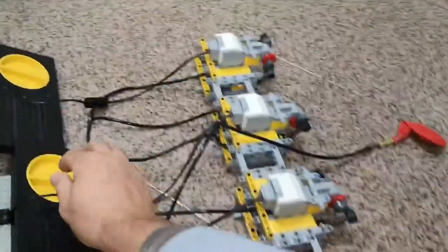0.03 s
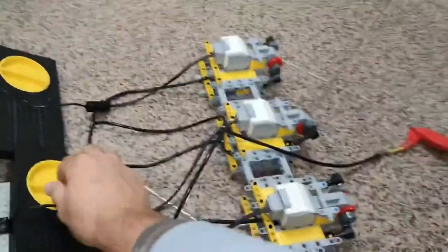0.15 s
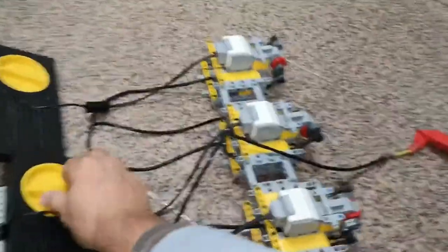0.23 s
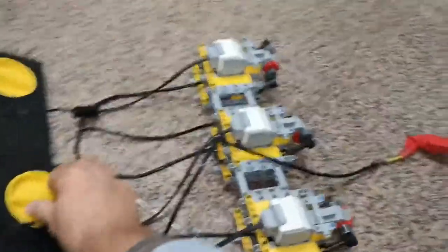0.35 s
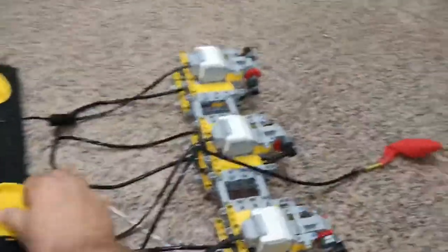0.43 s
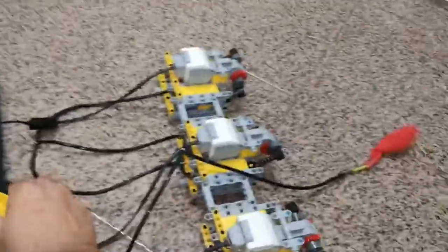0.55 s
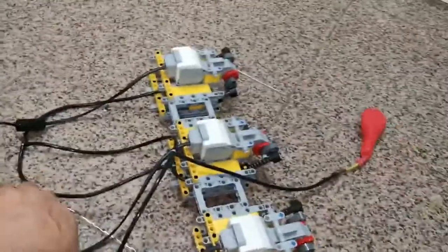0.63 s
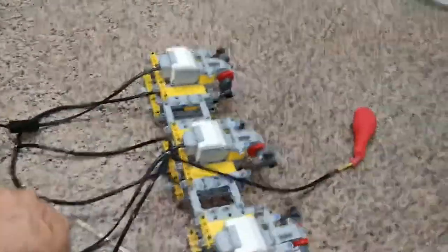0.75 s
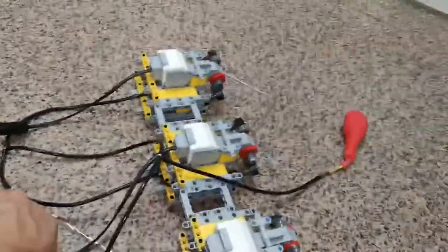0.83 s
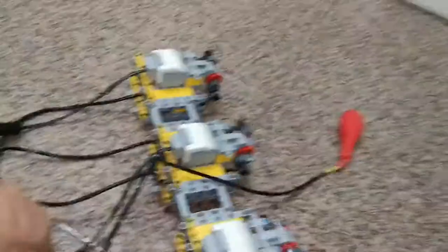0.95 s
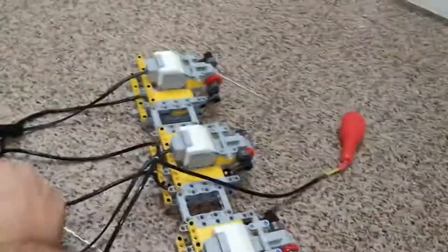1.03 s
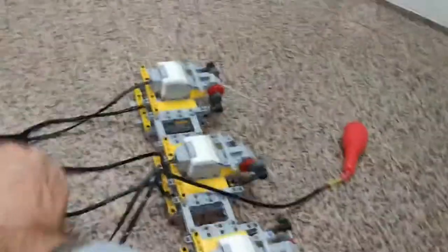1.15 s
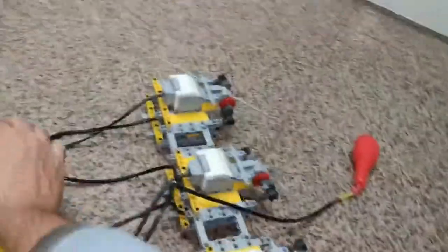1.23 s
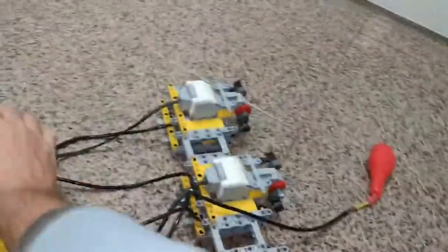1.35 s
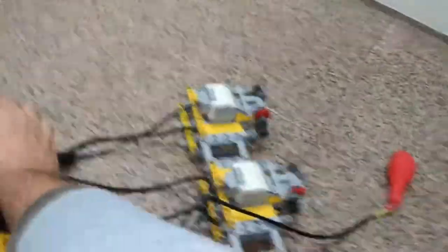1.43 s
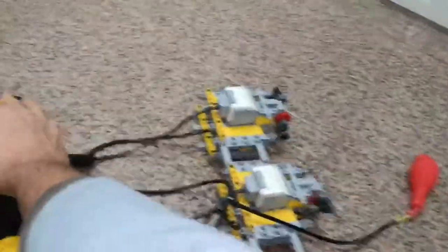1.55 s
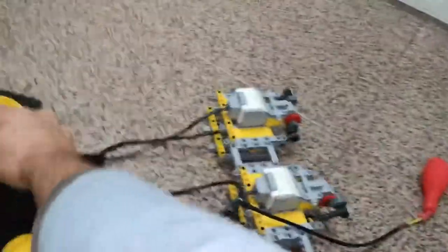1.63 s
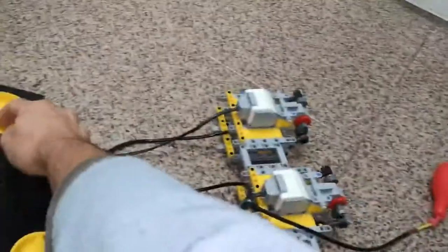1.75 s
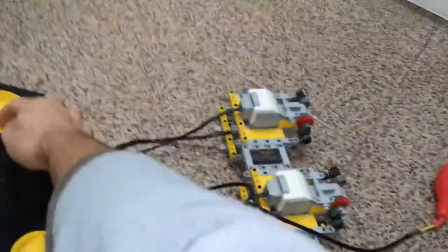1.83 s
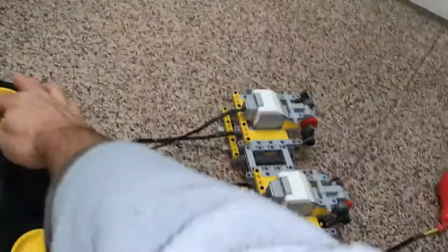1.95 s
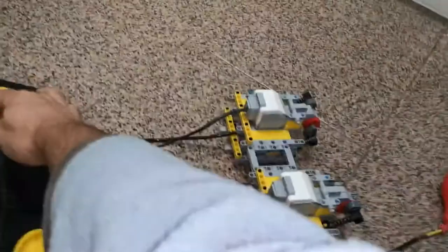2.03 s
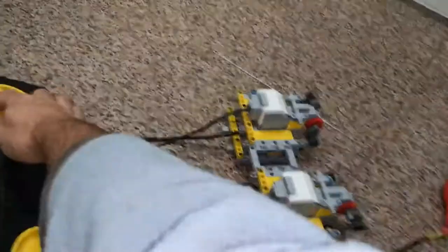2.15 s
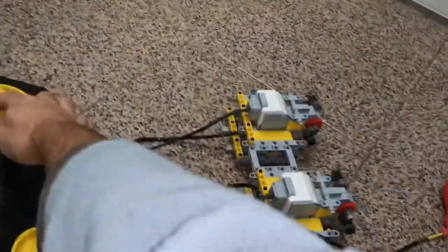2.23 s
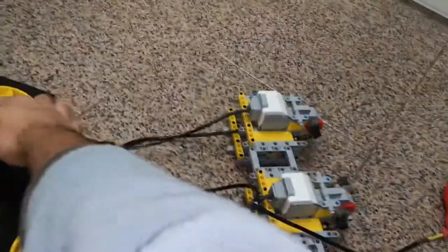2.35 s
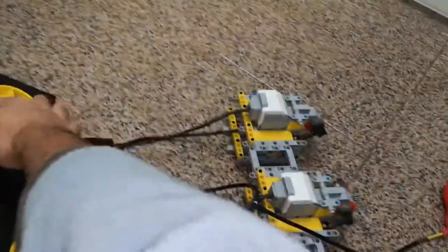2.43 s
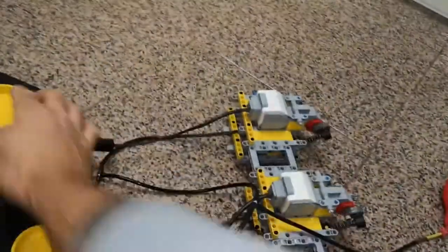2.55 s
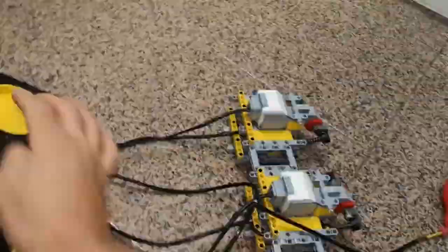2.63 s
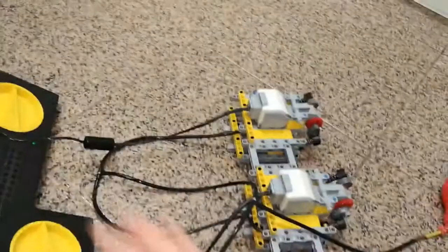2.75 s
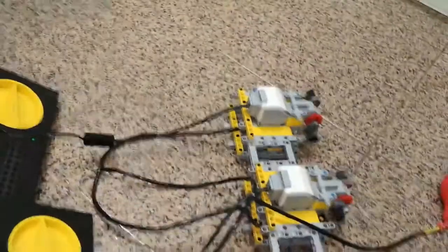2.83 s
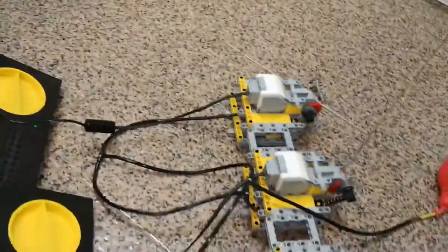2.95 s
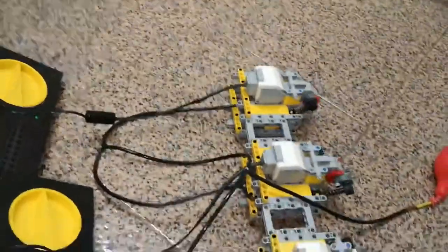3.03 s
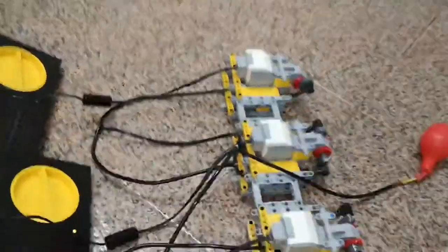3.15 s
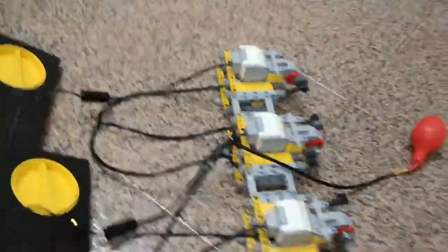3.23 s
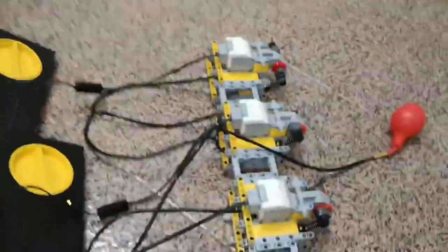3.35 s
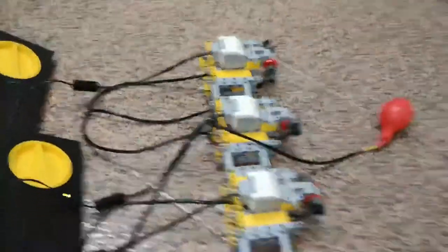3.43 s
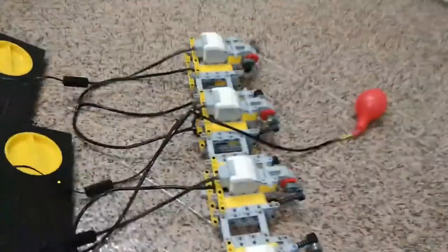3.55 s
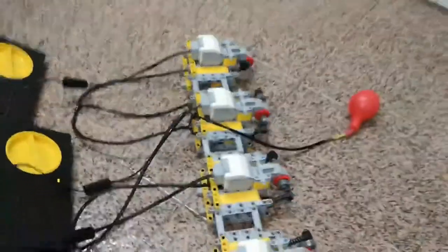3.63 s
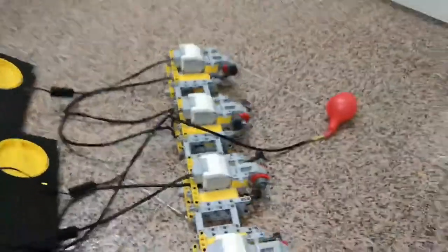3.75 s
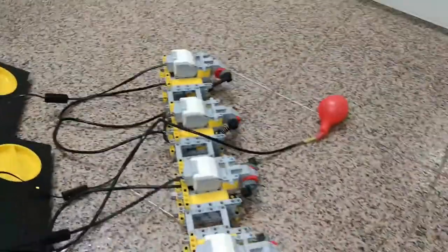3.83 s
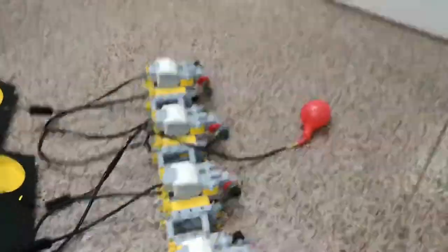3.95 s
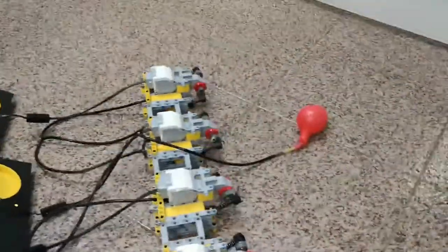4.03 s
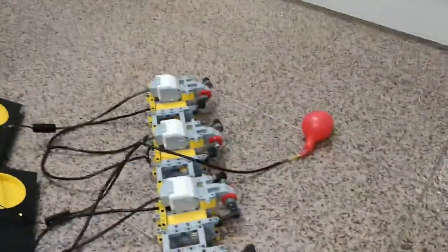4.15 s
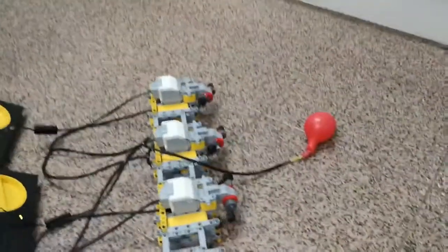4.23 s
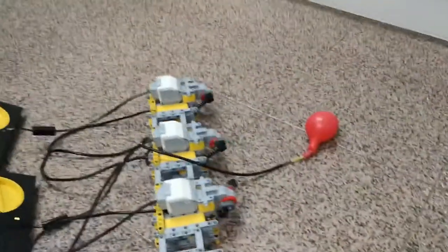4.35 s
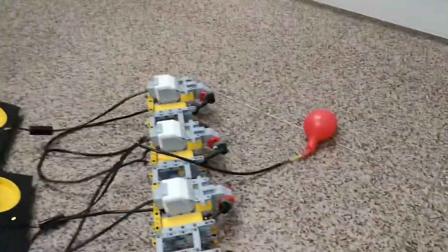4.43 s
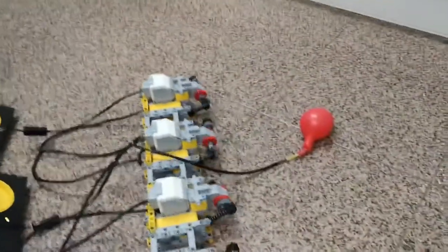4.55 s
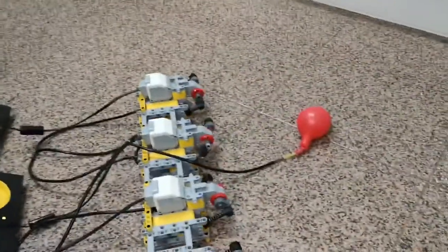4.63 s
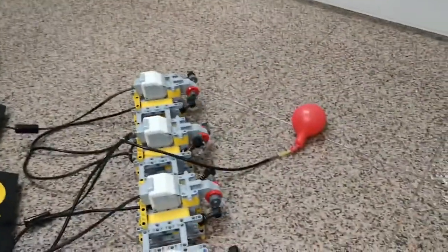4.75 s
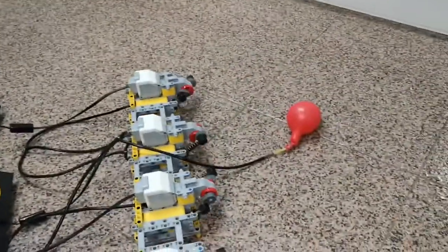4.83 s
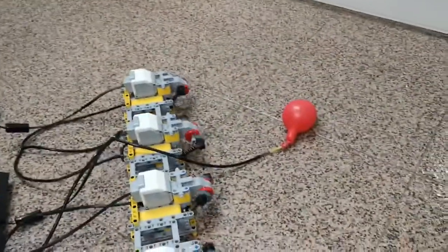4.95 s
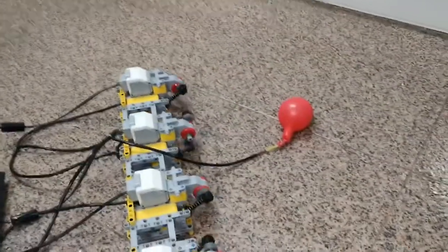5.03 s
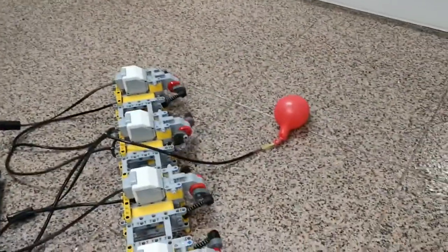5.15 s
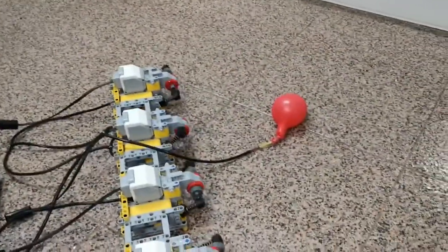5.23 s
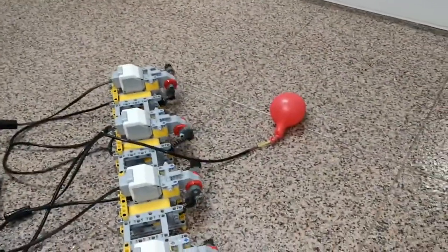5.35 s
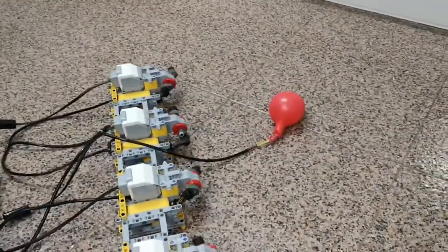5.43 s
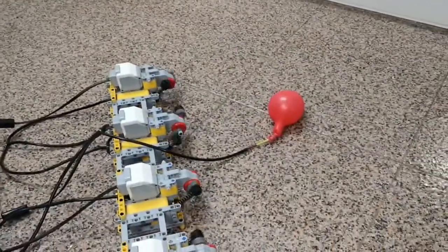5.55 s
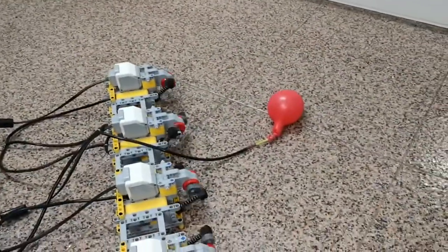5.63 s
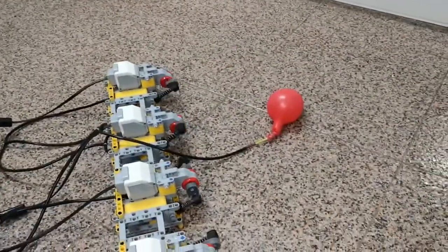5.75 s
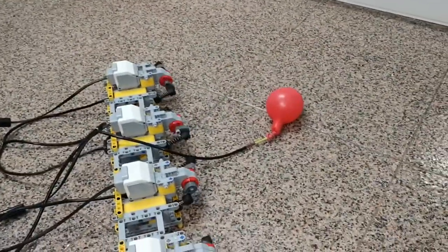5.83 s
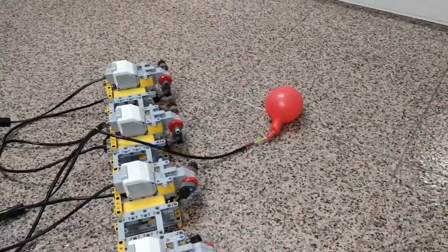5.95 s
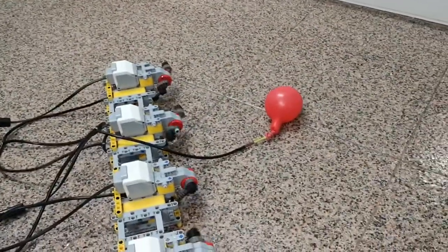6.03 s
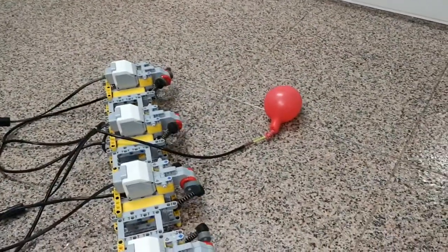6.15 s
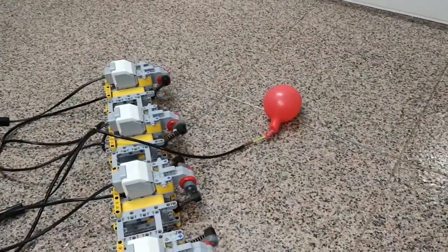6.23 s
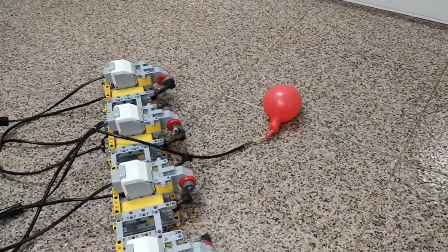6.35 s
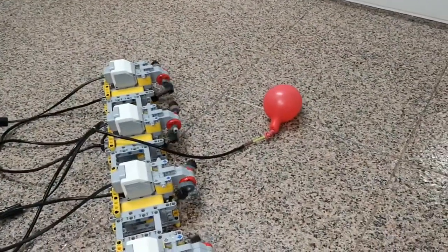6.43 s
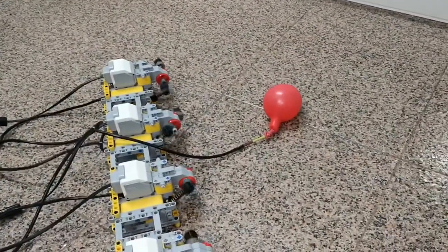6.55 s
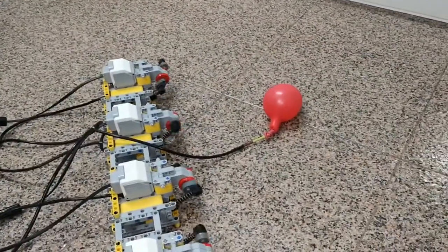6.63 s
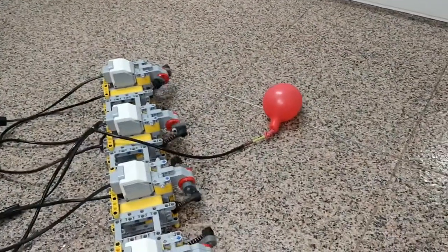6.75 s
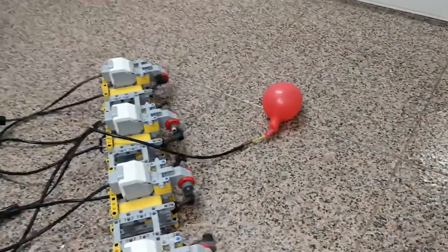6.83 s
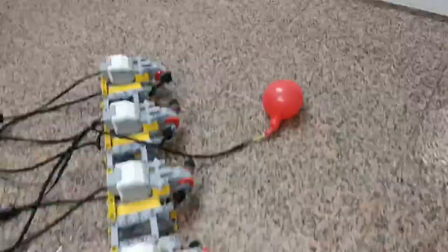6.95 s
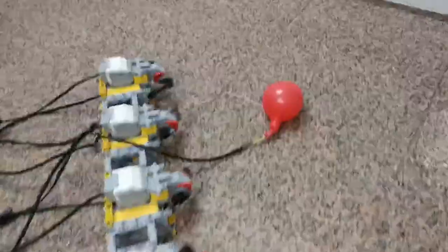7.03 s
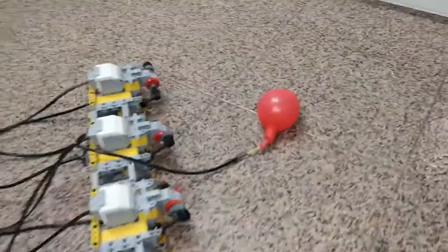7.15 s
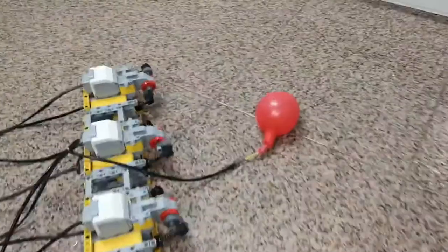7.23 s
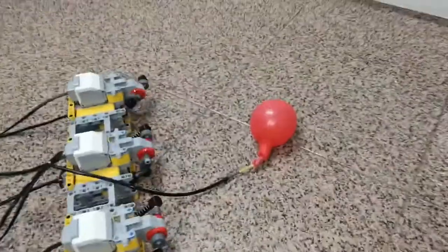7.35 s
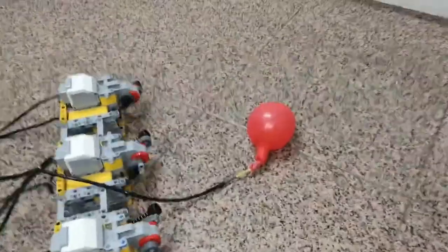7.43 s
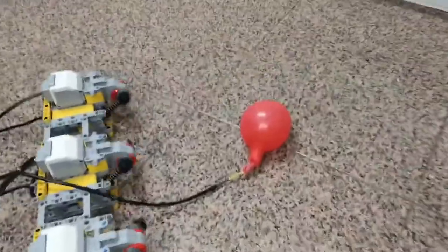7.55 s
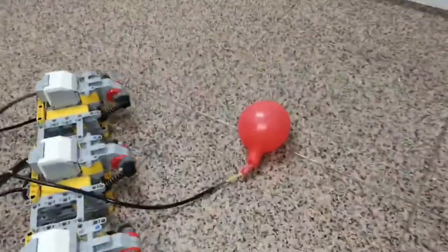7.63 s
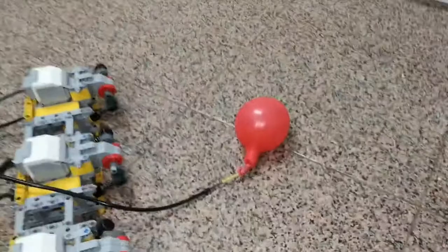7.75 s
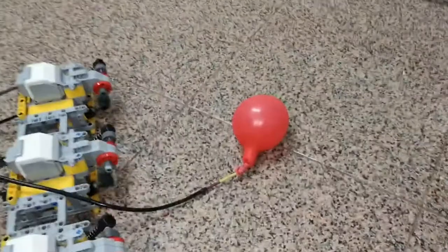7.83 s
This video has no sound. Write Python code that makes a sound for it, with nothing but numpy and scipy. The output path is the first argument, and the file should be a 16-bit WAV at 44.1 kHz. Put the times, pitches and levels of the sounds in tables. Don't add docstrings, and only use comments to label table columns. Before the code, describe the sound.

From the start to about 8 seconds, four small geared motors run without pause, driving toy air pumps on a hard floor. Each gives a thin, nasal whine around two kilohertz that dips and recovers roughly four times a second; the unsynchronized strokes overlap into a fluttering whirr, covered by bright, gritty plastic gear rattle. Sharp clacks fall near 0.5 and 0.9 s, then a firm hollow knock at 1.7 and a cluster of box taps with loose buzz from 2.1 to 2.6, mostly at left. Around 3.6 s the handheld microphone thumps and creaks; small dull bumps and faint rubs return near 5.3 to 5.9 and 7.3 to 7.8. The rattle changes in brightness and shifts from left toward right after about 4 s, swelling closer near 7.3. Short bare-room echo and faint low rumble lie beneath.

```python
import sys
import numpy as np
from scipy import signal
from scipy.fft import rfft, irfft
from scipy.io import wavfile

SR = 44100
rng = np.random.default_rng(int(sys.argv[2]) if len(sys.argv) > 2 else 0)


def digitize_waveform(pressure):
    field = np.atleast_2d(pressure).T
    bounded = np.clip(field, -1, 1)
    quanta = np.round(bounded * 32767).astype(np.int16)
    wavfile.write(sys.argv[1], SR, quanta)


def boost_factor(decibels):
    exponent = np.asarray(decibels, float) / 20
    return 10 ** exponent


N = 348390

# lowest_speed_s, lowest_whine_hz, free_whine_hz, whine_db
STROKES_A = [(0.072, 1762, 2208, -47), (0.319, 1614, 2264, -40), (0.571, 1772, 2314, -47.5),
             (0.813, 1613, 2223, -41), (1.068, 1597, 2243, -43), (1.317, 1562, 2239, -44),
             (1.574, 1626, 2281, -48), (1.826, 1562, 2216, -46), (2.083, 1650, 2230, -49),
             (2.337, 1456, 2260, -39.5), (2.597, 1556, 2232, -44), (2.861, 1408, 2204, -39.5),
             (3.118, 1609, 2241, -37.5), (3.38, 1416, 2196, -40), (3.639, 1575, 2240, -39),
             (3.906, 1411, 2203, -40.5), (4.173, 1565, 2207, -40), (4.435, 1577, 2200, -42),
             (4.682, 1573, 2261, -39), (4.946, 1456, 2191, -45), (5.221, 1517, 2183, -41.5),
             (5.475, 1475, 2184, -44.5), (5.739, 1527, 2200, -43.5), (5.996, 1543, 2186, -39),
             (6.253, 1602, 2218, -46.5), (6.518, 1593, 2210, -39), (6.775, 1544, 2204, -44.6),
             (7.037, 1486, 2202, -39), (7.286, 1577, 2232, -42), (7.543, 1469, 2198, -40),
             (7.802, 1640, 2244, -42)]
STROKES_B = [(0.0, 1920, 2020, -71), (0.239, 1810, 2235, -41.5), (0.499, 1923, 2163, -41),
             (0.733, 1746, 2247, -46.5), (0.987, 1841, 2173, -36), (1.237, 1690, 1995, -48),
             (1.486, 1743, 2134, -35.5), (1.736, 1691, 1992, -47), (1.983, 1740, 2177, -45.5),
             (2.235, 2120, 2205, -49), (2.489, 1736, 2165, -45), (2.739, 1569, 2166, -49),
             (3.011, 1652, 2117, -38.5), (3.285, 1486, 2320, -40.5), (3.544, 1648, 2124, -41.5),
             (3.795, 1500, 2160, -42), (4.049, 1773, 2334, -39.5), (4.31, 1572, 2171, -44.5),
             (4.578, 1780, 2224, -43.0), (4.839, 1482, 2118, -53), (5.098, 1819, 2190, -39),
             (5.348, 1647, 2192, -52), (5.605, 1609, 2110, -37.5), (5.882, 1559, 2152, -46.5),
             (6.146, 1660, 2166, -39.5), (6.41, 1607, 2114, -48), (6.68, 1687, 2116, -41.5),
             (6.934, 1408, 2098, -55), (7.194, 1765, 2137, -39.5), (7.446, 1573, 2111, -48),
             (7.705, 1788, 2130, -40.5)]
STROKES_C = [(0.072, 1940, 2054, -64), (0.335, 1642, 2260, -50), (0.605, 1798, 2090, -32.5),
             (0.863, 1666, 2020, -56), (1.126, 1750, 2140, -56), (1.392, 1777, 2265, -44),
             (1.644, 2122, 2237, -36.5), (1.903, 1698, 2326, -35.5), (2.163, 2124, 2344, -38),
             (2.409, 1702, 2117, -39), (2.656, 2132, 2253, -34.5), (2.902, 1616, 2011, -53),
             (3.158, 2135, 2232, -33.5), (3.425, 2097, 2168, -49), (3.684, 1602, 2130, -50),
             (3.949, 1804, 2023, -41), (4.213, 1492, 2208, -37), (4.465, 1659, 2025, -44),
             (4.707, 1528, 2247, -38), (4.949, 1508, 2199, -37), (5.201, 1669, 2288, -39),
             (5.475, 1530, 2210, -35), (5.733, 1623, 2229, -40), (5.994, 1607, 2208, -41),
             (6.263, 1624, 2264, -52), (6.53, 2076, 2243, -45), (6.795, 2110, 2333, -41),
             (7.041, 1407, 2223, -38), (7.301, 1582, 2288, -39), (7.57, 2105, 2231, -54),
             (7.835, 1665, 2058, -57)]
STROKES_D = [(0.177, 1783, 1984, -34), (0.452, 1720, 2082, -54), (0.719, 1892, 2173, -34),
             (0.98, 1638, 2060, -47), (1.229, 2107, 2232, -39), (1.489, 1820, 2174, -39),
             (1.744, 2072, 2270, -42), (2.011, 1770, 1992, -39), (2.252, 1675, 2004, -41),
             (2.515, 1754, 2165, -42), (2.776, 2078, 2200, -58), (3.032, 1725, 2124, -48),
             (3.293, 1562, 2320, -51), (3.554, 2120, 2347, -34), (3.811, 1704, 2240, -49),
             (4.083, 1785, 2042, -34), (4.35, 1413, 2085, -54), (4.607, 1793, 2115, -36),
             (4.866, 1474, 2000, -54), (5.141, 1585, 2045, -32), (5.389, 1512, 2012, -49),
             (5.643, 1680, 2120, -33), (5.894, 1523, 2154, -59), (6.154, 1786, 2200, -49),
             (6.403, 2128, 2233, -51), (6.647, 1740, 2282, -54), (6.894, 1779, 2300, -34.5),
             (7.141, 2124, 2214, -50), (7.393, 1675, 2160, -52), (7.643, 2167, 2230, -42),
             (7.897, 1883, 1994, -56)]
# distance_db, upper_orders_db
MOTOR_LEVELS = [(-2.5, 1.5), (-3.5, -1), (-9, -2), (-9.5, -5)]
# whine_multiple, level_db
MESH_ORDERS = [(0.5, 2), (1, 4), (1.5, 0), (2, -8), (2.5, -7), (3, -7), (4, -10)]
# frequency_hz, level_db
HOUSING_RESPONSE = [(700, -36), (950, -37.5), (1100, -10), (1400, -13), (1750, 0), (2200, -1), (2750, -9.5),
                    (3050, 2.5), (3500, 2.5), (4000, -2.5), (5200, 1), (7000, -6), (10500, -20)]
RATTLE_CENTRES = [1900, 3389, 5582, 10000]
# frequency_hz, density_db_per_hz
RATTLE_SPECTRUM = [(470, -62), (800, -28), (998, -28), (1090, -11), (1290, -13.5), (1800, -2.5), (2500, -1),
                   (3120, 0), (4300, -2), (5220, 5), (6200, -3.5), (7100, 2.5), (8200, -7.5), (9800, -2),
                   (11300, -7), (15000, -19.5)]
# frequency_hz, likeness_ratio
LIKENESS = [(900, 1), (2000, 0.4), (4000, 0.04), (6000, 0.62), (8500, 1), (13000, 0.52)]
# level_db, nearness_db_per_db, bearing_db_per_db, tilt_db_per_db,
# near_stall_ratio, far_stall_ratio
RATTLE_GROUPS = [(-40, 1, 0.42, -0.45, 1.1, 0.18), (-34.5, 0.93, 0.65, -0.36, 1.8, 0.092),
                 (-34, 0.05, -0.34, 0.16, 0.59, 0.28), (-38, 0.49, -0.23, -0.28, 0.11, 0.86)]
# time_s, depth_db
NEAR_STALLS = [(0.092, -1.5), (0.351, -4.5), (0.572, -4), (0.83, -4), (1.067, -3), (1.317, -2),
               (1.569, -2.5), (1.778, 0), (2.186, 0), (2.364, -4.1), (2.678, -1), (2.882, -2.5),
               (3.114, -3.9), (3.378, -1), (3.603, -4.3), (3.914, -1.5), (4.157, -1.4), (4.424, -1.5),
               (4.689, -2.7), (5.206, -2), (5.458, -3.5), (5.725, -1), (6.005, 0), (6.38, -1), (6.616, -2),
               (6.768, -0.5), (7.044, -4), (7.278, -2), (7.526, -4), (7.799, 0)]
# time_s, depth_db
FAR_STALLS = [(0.292, -6.5), (0.788, -3.6), (1.016, -2.5), (1.483, -5.5), (1.748, -2.5), (2.332, -3.5),
              (2.827, -5), (3.271, -5), (3.797, -4), (4.23, -3), (4.761, -3.5), (5.147, -4), (5.434, -1.8),
              (5.712, -2.5), (6.111, -1.7), (6.349, 1), (6.988, -4), (7.409, -3.7)]
# time_s, pitch_hz, level_over_rattle_db
GAP_TRACK = [(0.0, 5300, -6), (0.7, 5160, -10), (1.2, 5170, -17), (3.6, 5200, -15.5), (3.72, 5216, -3),
             (4.0, 5380, -7), (4.32, 5450, 0), (4.4, 5300, -16), (5.5, 5260, -19), (7.05, 5202, -13),
             (7.17, 5110, -13), (7.45, 5223, -3), (7.9, 5080, -11)]
# time_s, nearness_db, bearing_left_right_db, tilt_db
RECORDER_POSE = [(0.0, 6.5, 5.5, 14.5), (0.3, -5, 9.5, 2), (0.45, -2.5, 7.5, 6.5), (0.75, 1, 4.5, 8),
                 (1.2, -1.5, 0.5, -4), (1.6, -5, 1, -9), (2.5, -6, -0.5, -9), (2.8, 3.5, 0.5, 5),
                 (3.1, 4.5, -1.5, 3.5), (3.4, -1.5, 2, 1), (3.75, 4.5, -0.5, 7), (4.2, 1, -4.5, 1),
                 (4.45, 3.5, -4.5, 2.5), (5.5, 3.5, -5.5, 3.7), (6.9, 2.5, -4.5, 0), (7.3, 9, -5.5, 12.5),
                 (7.6, 4.5, -6, 2), (7.9, 8, -5, 5)]
# start_s, peak_db, brightness_db, spot_hz, left_right_db
KNOCKS = [(0.523, -23.5, 11.5, 293, 10), (0.53, -21.5, 15.5, 995, 5), (0.894, -30.5, 17, 406, 1),
          (0.916, -40, 17, 1014, 4), (1.668, -32, -17, 450, 10), (1.686, -16, 1.5, 405, 3),
          (1.7, -23, -9, 593, 10), (1.725, -30, -14, 250, 2), (1.69, -26, -20, 218, 0),
          (2.215, -30.5, -17, 340, 0), (1.827, -31, -21, 488, 13), (1.929, -28.5, -2, 353, 14),
          (2.095, -16.5, -8, 488, 2), (2.197, -20, -6, 594, 8), (2.316, -19, 9.5, 347, 4.5),
          (2.325, -28, 9, 721, 15), (2.341, -39, 23.5, 402, 1), (2.383, -21, -1, 416.5, 4),
          (2.501, -20, -1, 450, 10), (2.641, -26.5, -22, 604, 3), (2.959, -54, -6, 306.6, -4)]
# frequency_hz, level_db, t60_s
BOX_MODES = [(223, -18, 0.15), (264, -3, 0.075), (340, -14, 0.13), (403.8, -4.5, 0.11), (475, 2.5, 0.063),
             (513, -24, 0.13), (597, 10.5, 0.071), (667, 5, 0.06), (860, 18, 0.18), (960, -6, 0.081),
             (1040, 18, 0.19), (1160, -24, 0.05)]
# release_s, peak_db,
# swing_hz, snap_hz
THUMPS = [(0.525, -24.5, 220, 900), (0.896, -39, 273, 600), (1.931, -45, 252, 500),
          (2.501, -27, 263.5, 599.4), (2.946, -36.5, 143.6, 401.7), (3.596, -22, 80, 1512),
          (3.62, -33, 40.1, 119.2), (3.675, -35, 60.1, 304), (3.69, -36, 45, 149), (3.711, -37, 90, 1200),
          (3.832, -38, 200, 400), (3.856, -31, 90, 301.6), (3.872, -30.5, 60, 201),
          (3.935, -42.5, 104.8, 249.2), (5.302, -33, 110.1, 281), (5.314, -32, 79.8, 301.2),
          (5.562, -35, 110.4, 350), (5.576, -37, 77.9, 200.4), (5.614, -40, 112.8, 403),
          (5.684, -33, 99.4, 279), (5.696, -35, 73.6, 300.5), (5.753, -30.5, 111, 1205),
          (5.869, -30, 104.2, 1180), (6.202, -46.5, 190, 398), (7.299, -42, 209.7, 399.8),
          (7.368, -42.5, 90.2, 400), (7.4, -36.5, 201, 601), (7.442, -46, 200, 451), (7.486, -41, 300, 606),
          (7.551, -38, 181, 502), (7.612, -30, 100.2, 248), (7.73, -30.5, 100.4, 496.5),
          (7.788, -38, 250, 701)]
# start_s, end_s, low_hz, high_hz, level_db
RUBS = [
    (6.63, 6.87, 88, 120, -47),
    (4.0, 4.3, 94, 234, -57),
    (7.36, 7.51, 124, 520, -49.5),
    (3.63, 3.69, 95, 710, -46.5),
    (3.77, 3.85, 61, 360, -48),
    (2.93, 3.02, 105, 260, -52),
    (5.4, 5.7, 81, 224, -55.5),
]
# frequency_hz, density_db_per_hz
RUMBLE_SPECTRUM = [(12, -26), (20, 3.5), (163, -15.5), (225, -11), (339, -10.5), (427, -22.5), (600, -22),
                   (795, -14), (877, -16.5), (1000, -9), (1300, -33), (2200, -120)]

RECOVERY_POWER = 2.8
SLACK_DB, SLACK_AT_STROKES, SLACK_WIDTH_STROKES = 5, 0.42, 0.076
LOAD_DB, UPPER_LOAD_DB = 2.5, 3
LOW_PAN_DB, LOW_PAN_DB_PER_DB = 1, 0.78
LAG_SAMPLES, LAG_SAMPLES_PER_DB = -5.5, 0.24
GAP_WIDTH_HZ = 920
KNOCK_RING_S, SPOT_DB_PER_OCTAVE, BOX_LEAD_SAMPLES = 0.097, 14, 23.2
THUMP_RING_S, THUMP_LAG_SAMPLES = 0.037, 27.2
FIDGET_FROM_S, FIDGET_GAP_S, FIDGET_DB = 4.0, 0.14, -47.5
ROOM_T60_S, ROOM_DB = 0.3, -3.5
RUMBLE_DB = -56


def motors():
    tracks = [speed(strokes) for strokes in (STROKES_A, STROKES_B, STROKES_C, STROKES_D)]
    tones = []
    for track, (distance_db, upper_db) in zip(tracks, MOTOR_LEVELS):
        tone = whine(*track, upper_db, wobble_hz=20, flutter_db=4.2, blur_rad=0.25)
        tones.append(boost_factor(distance_db) * tone)
    teeth = sum(np.sin(np.pi * np.cumsum(track[0]) / SR) for track in tracks) / 2
    low_pan_db, _, lag_samples = bearing()
    out = rattle(teeth, patchy_db=1.7, shared_db=0.7, grain=0.3)
    for tone, offset_samples in zip(tones, (2.5, 8.5, 10.0, -14.0)):
        out = out + place(tone, tone, low_pan_db, lag_samples + offset_samples)
    return out, sum(tones)


def speed(strokes):
    stroke_s, low_hz, free_hz, level_db = np.transpose(strokes)
    t = np.arange(N) / SR
    knots_s = np.r_[stroke_s[0] - 0.26, stroke_s, stroke_s[-1] + 0.26]
    turn = np.interp(t, knots_s, np.arange(-1, len(stroke_s) + 1))
    last = len(stroke_s) - 1
    low = low_hz[np.clip(np.round(turn).astype(int), 0, last)]
    free = free_hz[np.clip(np.ceil(turn).astype(int), 0, last)]
    past = turn % 1
    power = np.where(past < 0.5, RECOVERY_POWER, 2)
    hz = low + (free - low) * abs(np.sin(np.pi * turn)) ** power
    slack = np.exp(-((past - SLACK_AT_STROKES) / SLACK_WIDTH_STROKES) ** 2)
    load = np.maximum(-np.sin(2 * np.pi * past), 0)
    return hz, np.interp(t, stroke_s, level_db), slack, load


def whine(hz, level_db, slack, load, upper_db, wobble_hz, flutter_db, blur_rad):
    hz = hz + wobble_hz * drift(25.36)
    phase = 2 * np.pi * np.cumsum(hz) / SR
    level_db = level_db - SLACK_DB * slack + LOAD_DB * load
    n = np.arange(N)
    out = 0
    for order, order_db in MESH_ORDERS:
        upper = (order > 1) * (upper_db + UPPER_LOAD_DB * load)
        moving_db = level_db + upper + flutter_db * drift(19.8)
        coarse_db = moving_db[::32] + order_db + at_hz(HOUSING_RESPONSE, order * hz[::32])
        gain = np.interp(n, n[::32], boost_factor(coarse_db))
        blur = blur_rad * order * drift(47) if order > 1 else 0
        out = out + gain * np.sin(order * phase + blur)
    return out


def rattle(teeth, patchy_db, shared_db, grain):
    near_db, pan_db, tilt_db = in_time(RECORDER_POSE)
    low_pan_db, high_pan_db, lag_samples = bearing()
    white = rng.standard_normal((2, 2, N)) * (1 + grain * teeth) * boost_factor(shared_db * drift(5.1))
    white = signal.sosfilt(signal.butter(4, 880, "high", fs=SR, output="sos"), white)
    groups = np.zeros((4, 2, N))
    edges_hz = np.geomspace(850, 15200, 23)
    for k, (low_hz, high_hz) in enumerate(zip(edges_hz, edges_hz[1:])):
        hz = np.sqrt(low_hz * high_hz)
        direct, diffuse = band(white[k % 2], low_hz, high_hz)
        alike = np.clip(at_hz(LIKENESS, hz), 0, 1)
        gain = boost_factor(at_hz(RATTLE_SPECTRUM, hz) + patchy_db * drift(9.3))
        nearest = np.argmin(abs(np.log(hz / np.array(RATTLE_CENTRES))))
        stereo = np.sqrt(1 + alike) * direct + np.sqrt(1 - alike) * diffuse * [[1], [-1]]
        groups[nearest] += gain * stereo

    near_dip_db = stalls(NEAR_STALLS, width_s=0.031)
    far_dip_db = stalls(FAR_STALLS, width_s=0.052)
    levelled = []
    for group, (db, near, turn, tip, near_share, far_share) in zip(groups, RATTLE_GROUPS):
        pose_db = near * near_db + turn * pan_db + tip * tilt_db
        dip_db = near_share * near_dip_db + far_share * far_dip_db
        levelled.append(boost_factor(db + pose_db + dip_db) * unit(group))
    low, middle, high, top = levelled
    high = high + air_gap(high)
    out = place(*(low + middle), low_pan_db, lag_samples)
    out = out + place(*high, high_pan_db, lag_samples)
    return out + place(*top, high_pan_db, 0)


def air_gap(high):
    gap_hz, gap_db = in_time(GAP_TRACK)
    turning = np.exp(2j * np.pi * np.cumsum(gap_hz) / SR)
    lowpass = signal.butter(2, GAP_WIDTH_HZ / 2, fs=SR)
    gap = (signal.lfilter(*lowpass, high / turning) * turning).real
    return boost_factor(gap_db) * gap * high.std() / gap.std()


def stalls(rows, width_s):
    t = np.arange(0, N + 64, 64) / SR
    dips_db = sum(db * np.exp(-((t - s) / width_s) ** 2) for s, db in rows)
    return np.interp(np.arange(N) / SR, t, dips_db)


def bearing():
    pan_db = in_time(RECORDER_POSE)[1]
    lag_samples = LAG_SAMPLES + LAG_SAMPLES_PER_DB * np.minimum(pan_db, 0)
    return LOW_PAN_DB + LOW_PAN_DB_PER_DB * pan_db, pan_db, lag_samples


def knocks():
    out = np.zeros((2, N))
    t = np.arange(round(0.25 * SR)) / SR
    for start_s, peak_db, bright_db, spot_hz, pan_db in KNOCKS:
        contact = (1 + 0.6 * rng.standard_normal(len(t))) * np.exp(-t / 0.0006)
        shared_db = rng.normal(0, 1.5, len(BOX_MODES))
        strength = boost_factor(shared_db + rng.normal(0, 1.5, (2, len(BOX_MODES))))
        body = np.zeros((2, len(t)))
        for k, (hz, db, t60_s) in enumerate(BOX_MODES):
            mode_db = db - SPOT_DB_PER_OCTAVE * abs(np.log2(hz / spot_hz))
            body += strength[:, k:k + 1] * boost_factor(mode_db) * ring(contact, hz, t60_s)
        body = band(body, 0.65 * spot_hz, 1.55 * spot_hz)
        noise = rng.standard_normal(len(t)) + 1.75 * rng.standard_normal((2, len(t)))
        loose = noise * boost_factor(-60 * t / KNOCK_RING_S)
        buzz = band(loose, 0.8 * spot_hz, 1.3 * spot_hz)
        crack = band(loose * np.exp(-t / 0.0075), 520, 2720)
        crack = crack + 0.26 * band(loose * np.exp(-t / 0.0025), 2700, 5800)
        sound = body / abs(body).max() + 0.8 * buzz + boost_factor(bright_db) * crack
        at = round((start_s + 0.00055) * SR)
        out[:, at:at + len(t)] += boost_factor(peak_db - 4.5) * sound * boost_factor([[pan_db / 2], [-pan_db / 2]])
    return place(*out, 0.27, -BOX_LEAD_SAMPLES)


def thumps():
    out = np.zeros(N)
    t = np.arange(-0.02 * SR, 0.1 * SR) / SR
    events = np.r_[THUMPS, fidgets()]
    for release_s, peak_db, swing_hz, snap_hz in events:
        press = (0.24 + snap_hz / 1900) * np.exp(t / 0.0022)
        rebound = -np.cos(2 * np.pi * swing_hz * t - 0.6) * boost_factor(-60 * t / THUMP_RING_S)
        swing = np.where(t < 0, press, rebound)
        creak = band(rng.standard_normal(len(t)) * (t > 0) * np.exp(-abs(t) / 0.019), 94.0, 820)
        swing = signal.lfilter(*signal.butter(2, snap_hz, fs=SR), swing + 0.23 * creak)
        at = round((release_s - 0.022) * SR)
        out[at:at + len(t)] += (boost_factor(peak_db + 1.5) * swing)[:N - at]
    out = out + rubs()
    return place(out, out, -1.7, THUMP_LAG_SAMPLES)


def fidgets():
    chance = rng.random((40, 3))
    release_s = FIDGET_FROM_S + FIDGET_GAP_S * (np.arange(len(chance)) + chance[:, 0])
    peak_db = FIDGET_DB + 8.0 * (chance[:, 1] - 0.5)
    swing_hz = 65 + 180 * chance[:, 2]
    rows = np.c_[release_s, peak_db, swing_hz, np.full(len(chance), 260.0)]
    return rows[release_s < N / SR]


def rubs():
    out = np.zeros(N)
    for start_s, end_s, low_hz, high_hz, level_db in RUBS:
        at, size = round(start_s * SR), round((end_s - start_s) * SR)
        slips = rng.standard_normal(size) * boost_factor(3.4 * drift(16)[:size])
        slide = unit(band(slips, low_hz, high_hz)) * signal.windows.tukey(size, 0.4)
        out[at:at + size] += boost_factor(level_db) * slide
    return out


def room(x):
    t = np.arange(round(0.5 * SR)) / SR
    tail = rng.standard_normal((2, len(t))) * boost_factor(-60 * t / ROOM_T60_S) * (t > 0.006)
    tail /= np.sqrt((tail ** 2).sum(axis=1, keepdims=True))
    return boost_factor(ROOM_DB) * signal.fftconvolve(x[None], tail, axes=1)[:, :N]


def rumble(lumpy_db, apart):
    hz = np.maximum(np.fft.rfftfreq(N, 1 / SR), 1)
    spectrum = rfft(rng.standard_normal((2, N))) * boost_factor(at_hz(RUMBLE_SPECTRUM, hz))
    mid, side = irfft(spectrum, N)
    side = signal.lfilter([1, -1], [1, -0.95], side)
    both = mid + apart * side * [[1], [-1]]
    edges_hz = [15, 300, 650, 2000]
    lumps = 0
    for low_hz, high_hz in zip(edges_hz, edges_hz[1:]):
        lumps = lumps + band(both, low_hz, high_hz) * boost_factor(lumpy_db * drift(19.4))
    return boost_factor(RUMBLE_DB) * unit(lumps)


def unit(x):
    return x / np.sqrt(np.mean(x ** 2) + 1e-20)


def in_time(rows):
    s, *columns = np.transpose(rows)
    return [np.interp(np.arange(N) / SR, s, column) for column in columns]


def at_hz(points, hz):
    points = np.array(points)
    return np.interp(np.log(hz), np.log(points[:, 0]), points[:, 1])


def drift(rate_hz):
    r = np.exp(-80 * np.pi * rate_hz / SR)
    slow = signal.lfilter([1], [1, -2 * r, r * r], rng.standard_normal(N // 40 + 2002))[2000:]
    return np.interp(np.arange(N) / 40, np.arange(len(slow)), unit(slow))


def ring(x, hz, t60_s):
    r, w = boost_factor(-60 / (t60_s * SR)), 2 * np.pi * hz / SR
    return signal.lfilter([0, np.sin(w)], [1, -2 * r * np.cos(w), r * r], x + 1e-18)


def band(x, low_hz, high_hz):
    return signal.sosfilt(signal.butter(2, [low_hz, high_hz], "band", fs=SR, output="sos"), x)


def place(left, right, pan_db, lag_samples):
    n = np.arange(N)
    late_left = np.interp(n - 24 - lag_samples, n, left)
    late_right = np.interp(n - 24, n, right)
    return np.array([late_left * boost_factor(pan_db / 2), late_right * boost_factor(-pan_db / 2)])


def scene():
    machine, tones = motors()
    box = knocks()
    echo = room(tones + box.mean(axis=0))
    return machine + box + echo + thumps() + rumble(lumpy_db=4.0, apart=0.91)


def low_pass(x):
    return signal.sosfilt(signal.butter(12, 15180, fs=SR, output="sos"), x)


def record(dry):
    return low_pass(dry)


dry = scene()
out = record(dry)
digitize_waveform(out)
```